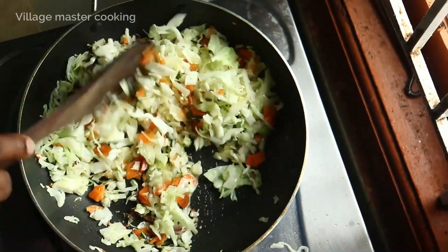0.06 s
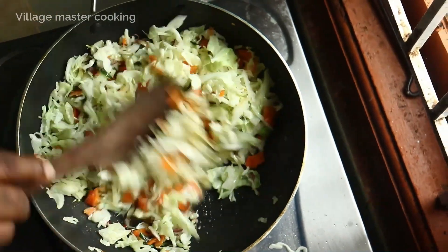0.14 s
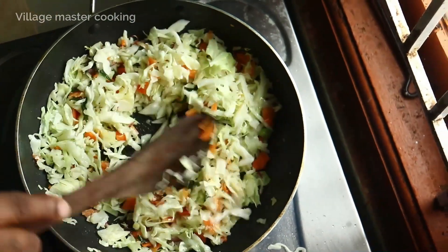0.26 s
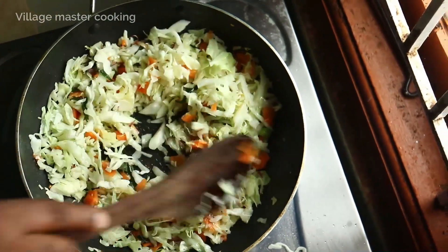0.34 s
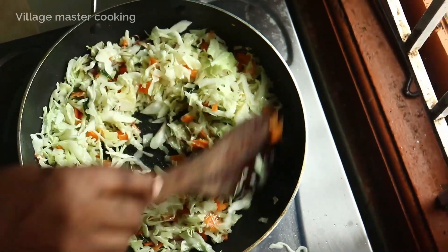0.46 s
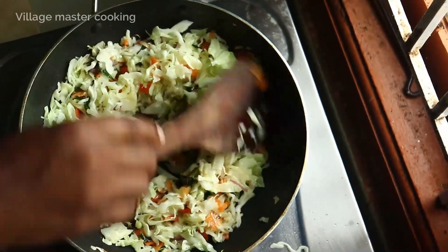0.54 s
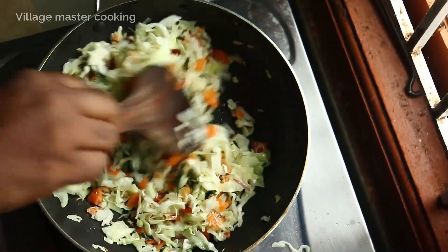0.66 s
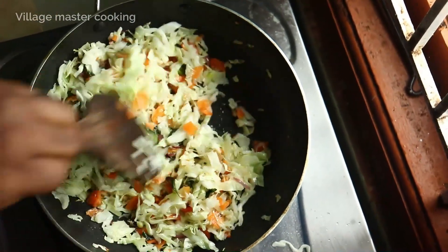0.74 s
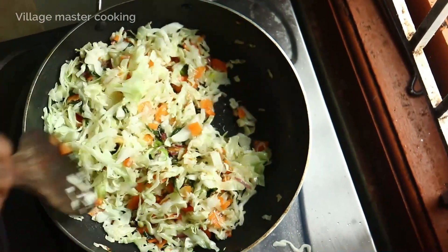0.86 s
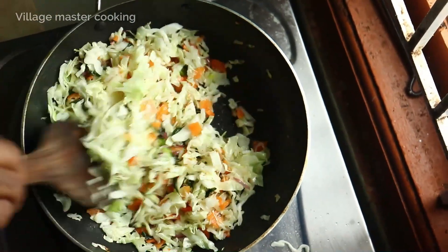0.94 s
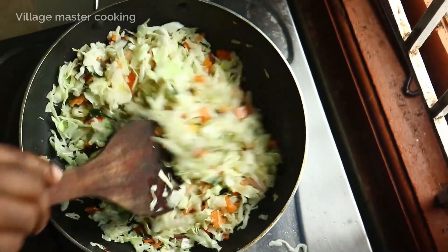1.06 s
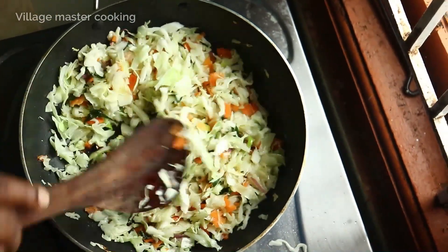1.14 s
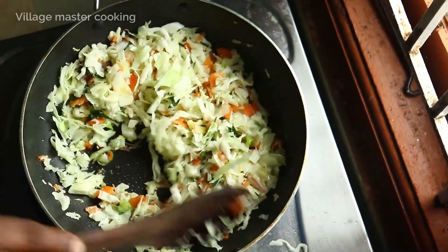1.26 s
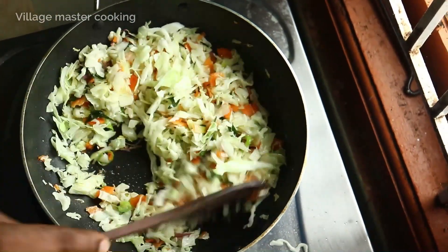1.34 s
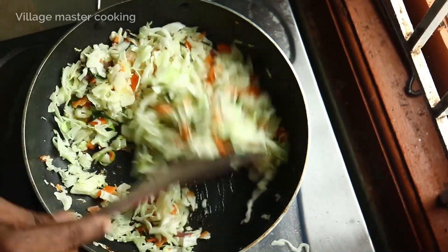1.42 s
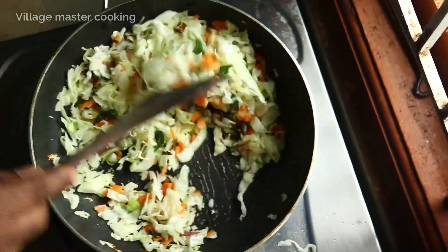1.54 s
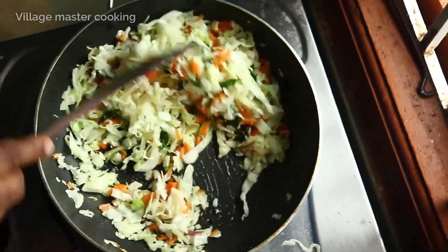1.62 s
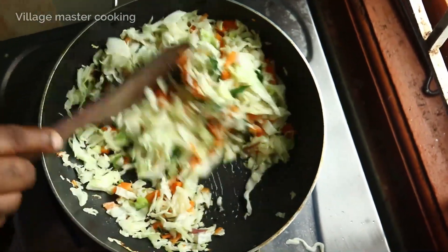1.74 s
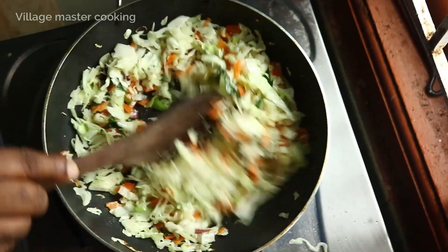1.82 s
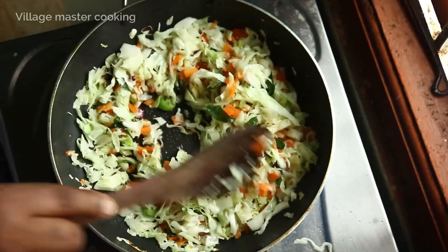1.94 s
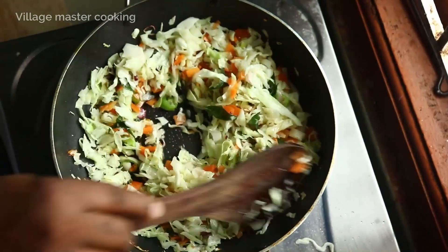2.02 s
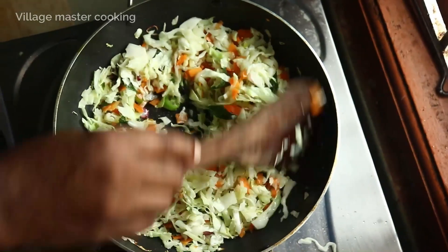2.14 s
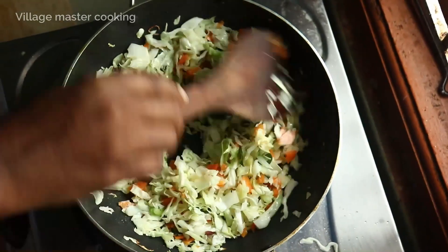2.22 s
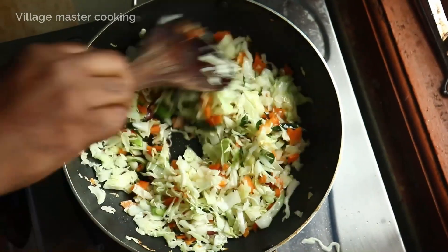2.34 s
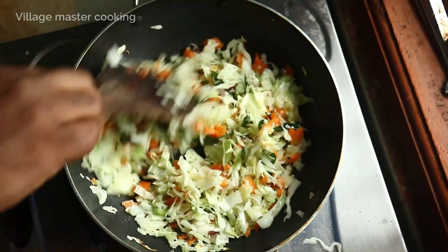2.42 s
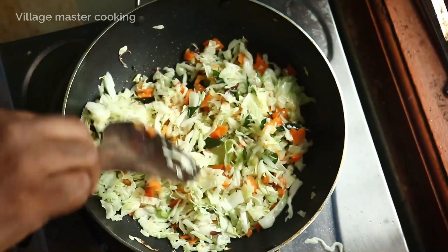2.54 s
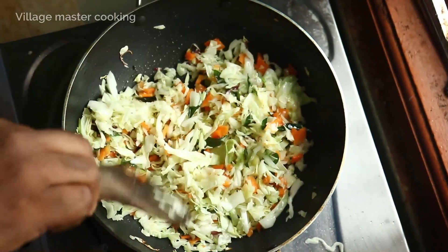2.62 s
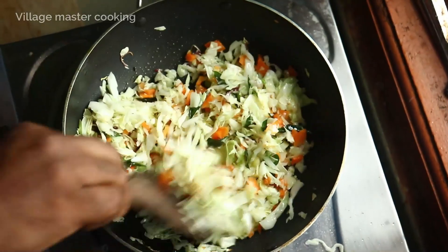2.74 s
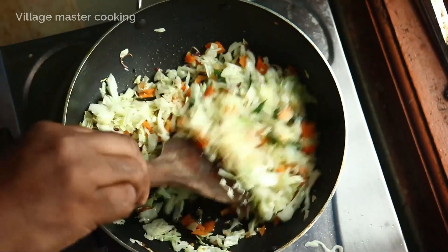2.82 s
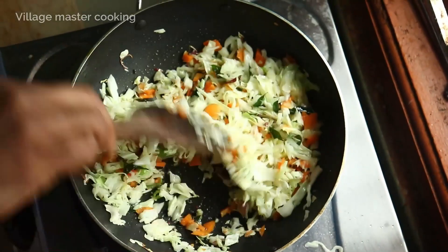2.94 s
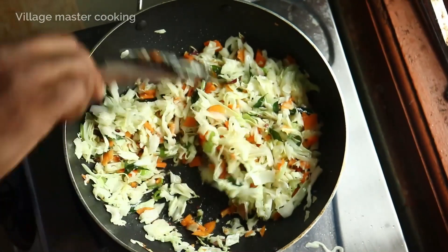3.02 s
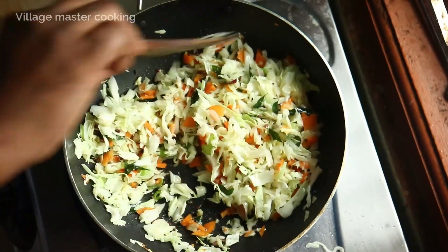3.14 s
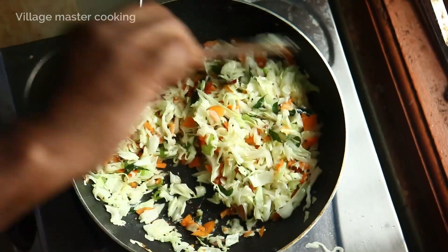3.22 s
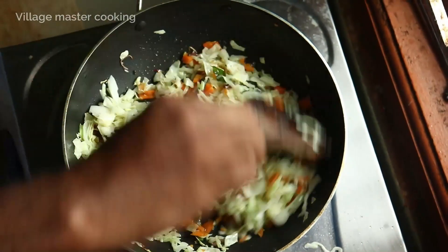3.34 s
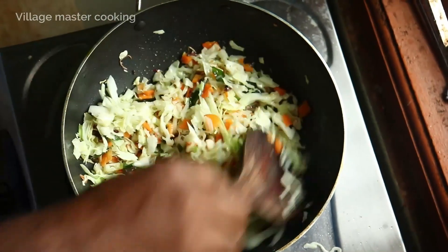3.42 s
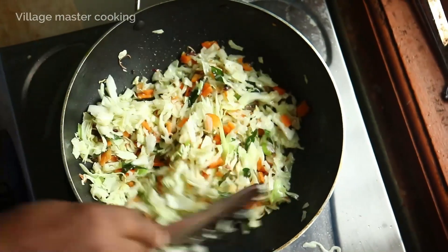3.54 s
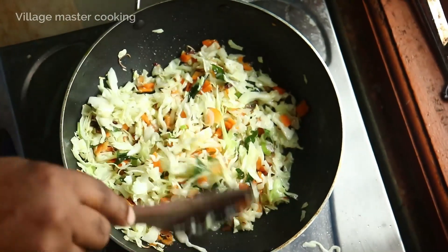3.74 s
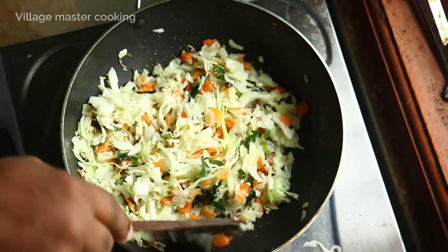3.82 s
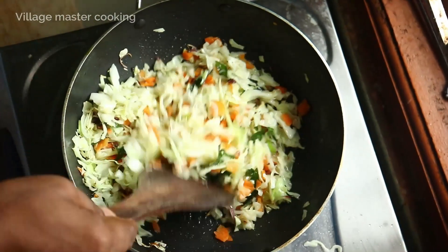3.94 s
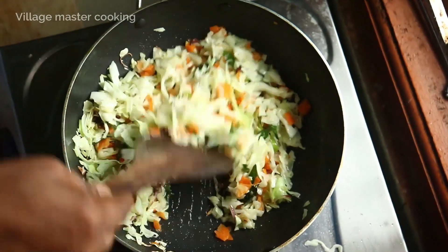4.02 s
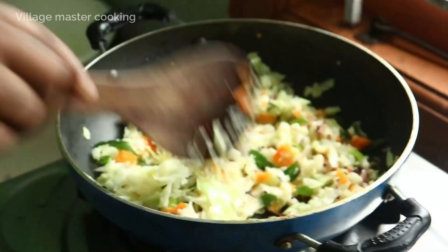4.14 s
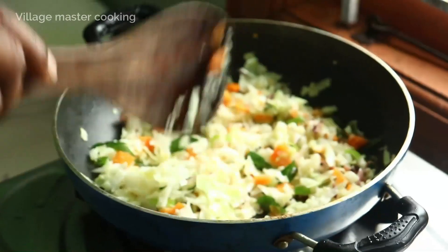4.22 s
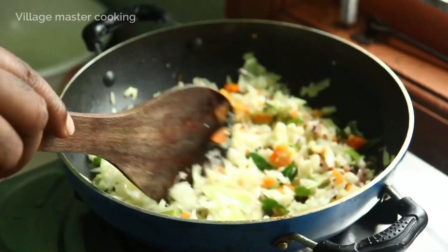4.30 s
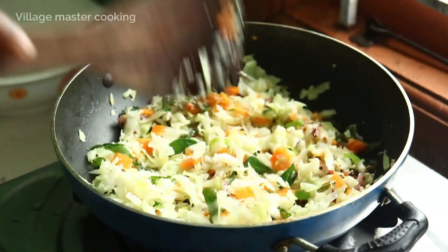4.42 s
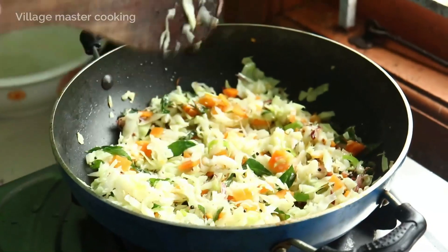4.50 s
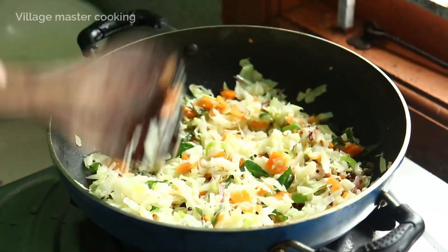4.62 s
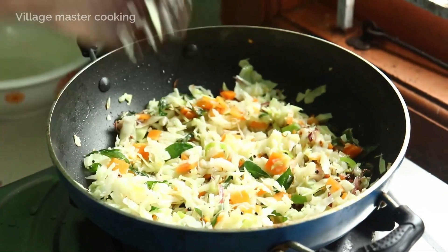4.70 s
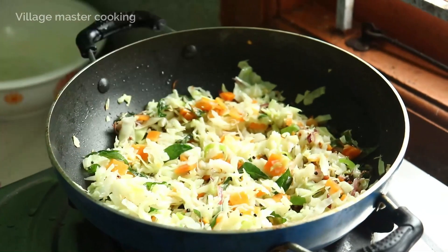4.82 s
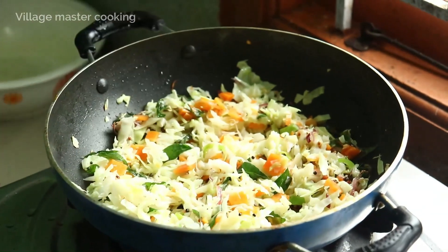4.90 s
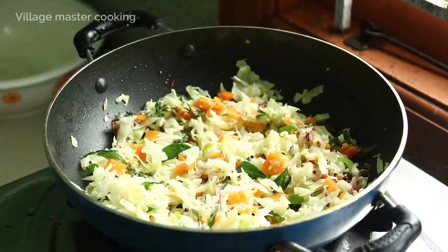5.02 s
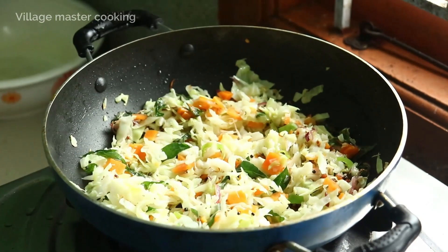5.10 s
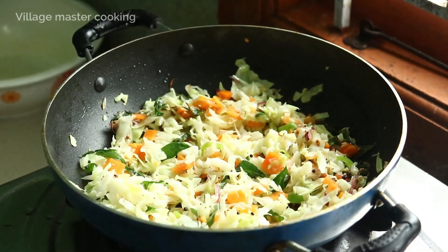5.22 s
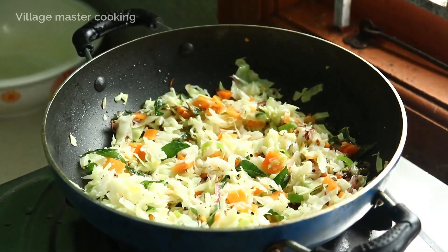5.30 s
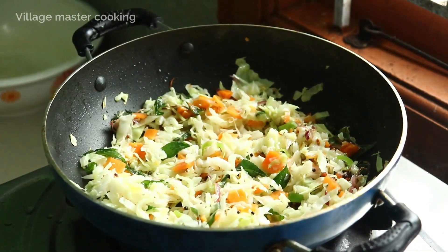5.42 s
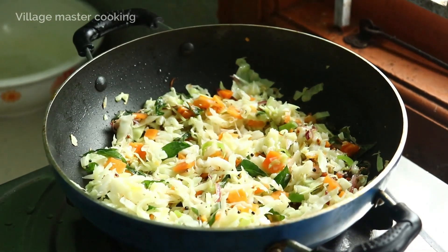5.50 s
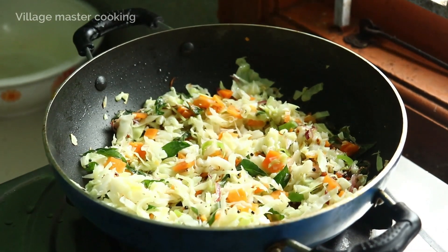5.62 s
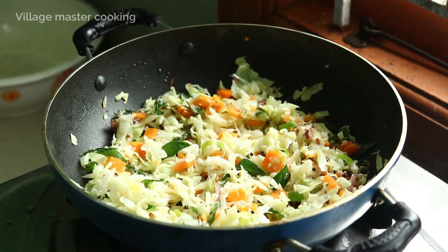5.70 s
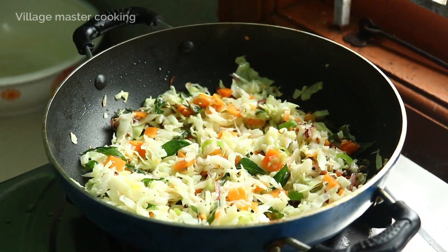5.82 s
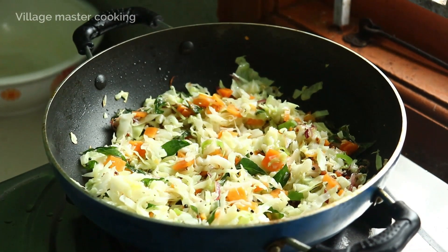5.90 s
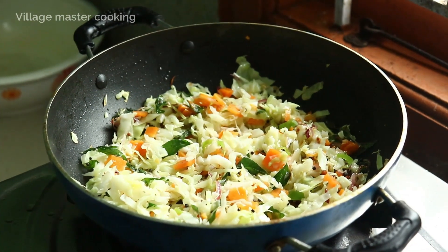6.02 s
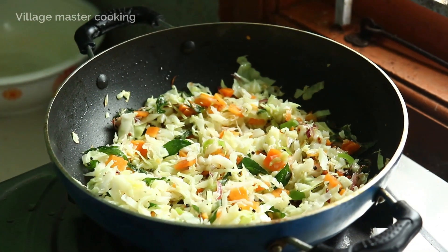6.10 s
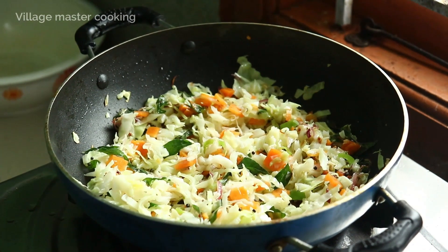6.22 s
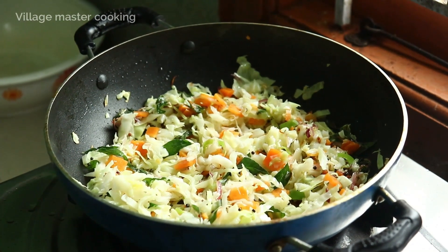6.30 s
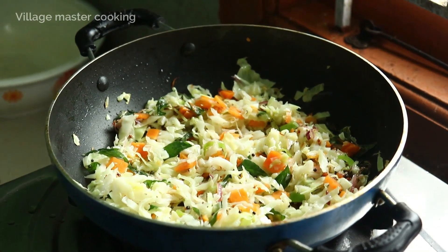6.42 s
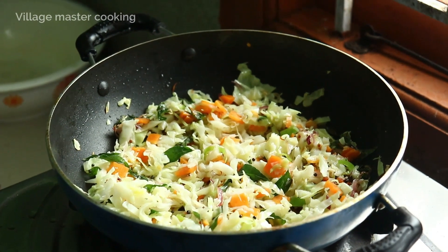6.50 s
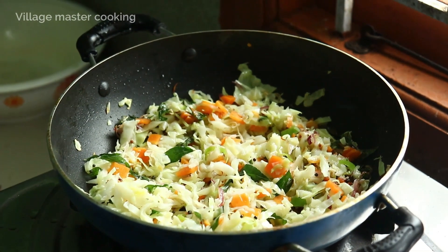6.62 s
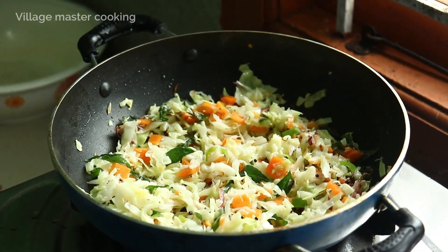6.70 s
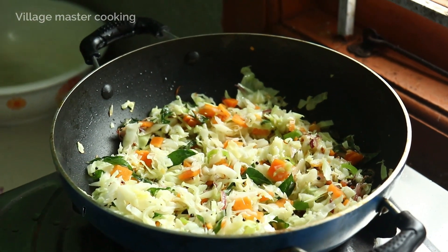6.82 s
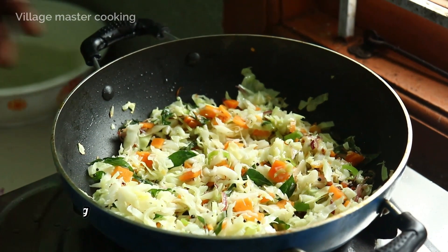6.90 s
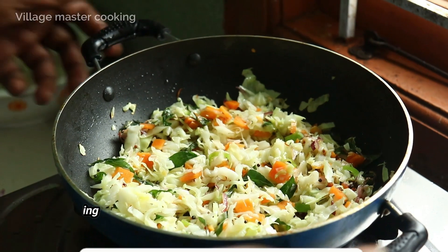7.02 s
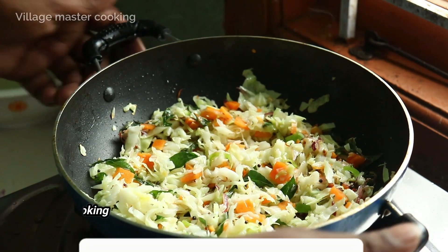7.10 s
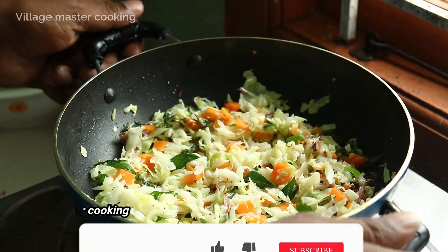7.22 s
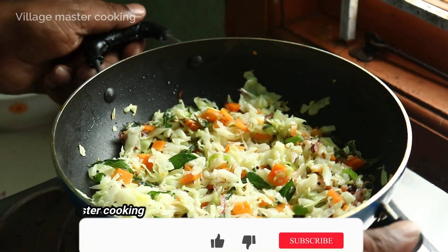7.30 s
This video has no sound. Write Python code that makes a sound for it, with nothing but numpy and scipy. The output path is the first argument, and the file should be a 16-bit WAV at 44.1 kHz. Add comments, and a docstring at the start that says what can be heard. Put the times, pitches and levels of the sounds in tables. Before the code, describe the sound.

Busy stir-frying with spatula knocks on a metal pan, cutting to softer sizzling, one hard wooden bang, utensil clacks and a final handle bump.

```python
"""Vegetables sizzling in a pan

Shredded vegetables sizzle (coloured noise and tiny bursts) in a hard-walled kitchen while a wooden spatula
scrapes (stick-slip bursts through pan resonances) and knocks the pan (damped modes and decaying noise).
The level dips for a few milliseconds, then the pan is heard duller, as from its side, and soon left alone.
Something wooden slams nearby, three light clacks follow as a utensil is laid down, and at the end a hand
takes hold of the pan."""
import sys
import numpy as np
from scipy import signal
from scipy.fft import rfft, irfft, next_fast_len
from scipy.io import wavfile
from scipy.ndimage import map_coordinates

SR = 44100
rng = np.random.default_rng(int(sys.argv[2]) if len(sys.argv) > 2 else 0)


def wrap_up_sound(samples):
    """Save the sound to the file named by the first command line argument, as 16-bit audio."""
    columns = np.atleast_2d(samples).T
    # keep every value between -1 and 1, then stretch to whole-number steps
    tamed = np.clip(columns, -1, 1)
    steps = np.round(tamed * 32767).astype(np.int16)
    wavfile.write(sys.argv[1], SR, steps)


N = 324135
TIME = np.arange(N) / SR
RING_TIME = np.arange(SR) / SR  # one second for each struck sound
DIP_S = 4.19  # the level dips here and the frying is duller from here on

# Resonances of the pan. Each row: frequency in Hz, relative strength in dB, 60 dB decay time in seconds.
PAN_MODES = [(154.4, -9, 0.47), (207, -4, .33), (231.5, 1, 0.25), (306.1, 0.5, 0.3), (320.3, -0.5, 0.64),
             (425, -1, 0.48), (468, -1, 0.41), (607, 1.5, 0.55), (661, 0, 0.78), (775, 3.5, 0.14),
             (833, 2.5, 0.35), (897, 0.5, 0.38), (932.5, 5.5, 0.22), (1056, -8, 0.8), (1140, -1.5, 0.28),
             (1399, -1, 0.19), (1620, -10, 0.32), (2024, -1.5, 0.15)]
# Likeness of the two ears. Each row: frequency in Hz, left-right correlation from -1 to 1.
EAR_LIKENESS = [(100, 0.99), (300, 0.98), (700, 0.79), (1400, 0.56), (2500, 0.21), (4500, 0.26),
                (8000, 0.12), (15000, -0.16)]


def amp(db):
    """Level: decibels to amplitude ratio."""
    return 10 ** (np.asarray(db) / 20)


def unit(x):
    """Normalization: scale to rms 1."""
    return x / np.sqrt(np.mean(x ** 2) + 1e-20)


def unit_onset(x, size=1764):
    """Normalization of a transient: scale its first 40 ms to rms 1."""
    return x / np.sqrt(np.mean(x[..., :size] ** 2) + 1e-20)


def along(points, hz):
    """Interpolation of (Hz, value) points on a logarithmic frequency axis."""
    point_hz, value = np.transpose(points)
    return np.interp(np.log(hz + 1), np.log(point_hz + 1), value)


def wobble(rate):
    """Slow random modulation: a smooth curve through random knots, rate of them a second."""
    knots = rng.standard_normal(int(N * rate / SR) + 4)
    return map_coordinates(knots, [TIME * rate])


def filtered(x, response):
    """Linear filtering: multiply the spectrum by a response of frequency."""
    n = x.shape[-1]
    padded = next_fast_len(n + 8192)
    spectrum = rfft(x, padded) * response(np.fft.rfftfreq(padded, 1 / SR))
    return irfft(spectrum, padded)[..., :n]


def below(hz, edge_hz, order=8):
    """Low-pass gain, falling ever more steeply above its edge."""
    return 1 / (1 + (hz / edge_hz) ** order)


def add(track, s, sound):
    """Superposition: mix a sound into a track at time s."""
    start = max(round(s * SR), 0)
    track[:, start:start + sound.shape[-1]] += sound[..., :N - start]


def half_angle(hz):
    """Interaural correlation as an angle: the cosine of twice this angle is the likeness."""
    return np.arccos(np.clip(along(EAR_LIKENESS, hz), -1, 1)) / 2


def diffuse(pair, spectrum):
    """Diffuse field: colour two unrelated signals and blend them, bass alike in both ears, treble apart."""
    def weights(hz):
        return amp(along(spectrum, hz)) * [np.cos(half_angle(hz)), np.sin(half_angle(hz))]
    mid, side = filtered(pair, weights)
    return unit(np.array([mid + side, mid - side]))


def ring(modes, scatter_db):
    """Modal decay: damped sines of random strength and phase; the higher ones reach the ears out of step."""
    hz, db, t60 = np.transpose(modes)[:, :, None]
    strength, phase, skew = rng.standard_normal((3, len(hz), 1))
    fade = amp(db + scatter_db * strength - 60 * RING_TIME / t60)
    apart = skew * half_angle(hz)
    cycles = hz * RING_TIME + phase
    ears = [np.sum(fade * np.sin(2 * np.pi * cycles + ear * apart), axis=0) for ear in (-1, 1)]
    return unit_onset(np.array(ears))


def clatter(spectrum, length, crack_db):
    """Reverberation: the crack of a contact, then noise in which each frequency dies at its own speed."""
    # Each row: frequency in Hz, relative 60 dB decay time, which length turns into seconds.
    room = [(100, 0.94), (250, 0.55), (700, 0.79), (1500, 0.56), (4000, 0.59), (12000, 0.5)]
    hz, t, z = signal.stft(rng.standard_normal((2, SR)), SR, nperseg=256)
    t60 = length * along(room, hz)[:, None]
    tail = signal.istft(z * amp(-60 * t / t60), SR, nperseg=256)[1][:, :SR]
    crack = amp(crack_db) * np.exp(-RING_TIME / 0.00045)
    return unit_onset(diffuse(tail, spectrum) * (1 + crack))


def bursts(rate, spread_db):
    """Shot noise: tiny bursts at random moments and of random sizes, each nearer to one ear."""
    when, size, side, lag = rng.random((int(rate * TIME[-1]), 4)).T
    gain = amp(-spread_db * np.log(np.maximum(size, .03))) * rng.choice([-1, 1], len(when))
    at = (when * (N - 8)).astype(int)
    left = np.bincount(at + 3, gain * np.cos(side * np.pi / 2), N)
    # the right ear hears each burst up to 3 samples earlier or later
    right = np.bincount(at + (lag * 7).astype(int), gain * np.sin(side * np.pi / 2), N)
    return unit(np.array([left, right]))


def swell(rise):
    """Exponential build-up of a contact with a time constant of rise seconds."""
    return 1 - np.exp(-RING_TIME / rise)


def direct(boost_db):
    """Direct sound: a struck thing stands out for a moment before the room takes over."""
    return 1 + amp(boost_db) * np.exp(-RING_TIME / .008)


def strokes(rows, attack, release):
    """Gesture envelopes, summed: each (start, length, size) builds up, holds and dies away exponentially."""
    total = 0
    for s, length, size in rows:
        onset = 1 - np.exp(-np.maximum(TIME - s, 0) / attack)
        total = total + size * onset * np.exp(-np.maximum(TIME - s - length, 0) / release)
    return total


def sizzle(spectrum, crackle_db, flutter_db):
    """Boiling noise: water bursts in the oil, near bursts over the blur of countless others, sputtering."""
    steam = rng.standard_normal((2, N)) + amp(crackle_db) * bursts(rate=1400, spread_db=3.5)
    steam = diffuse(steam, spectrum)
    boil = filtered(steam, lambda hz: below(hz, 6100))
    spray = steam - boil
    # the two bands flutter independently
    return boil * amp(flutter_db * wobble(30)) + spray * amp(flutter_db * wobble(30))


def frying():
    """Spectral colouring of boiling noise: bright as from above and flaring at turns, then duller, as from the side."""
    # Spectra before and after the dip. Each row: frequency in Hz, relative density in dB per Hz.
    spectrum_above = [(200, -21), (600, -11.5), (1000, -10), (1600, -4), (2800, -1), (3900, 2), (5000, 1),
                      (6200, -3), (9000, -2), (10500, -4), (13000, -3), (16000, -9.5)]
    spectrum_beside = [(260, -45), (450, -20), (610, -16.5), (720, -5.5), (890, -5.5), (960, -10),
                       (1530, -2), (1800, -4.5), (2800, 1.5), (3500, -1), (4250, 2.5), (7800, 0),
                       (11000, -7.5), (15900, -9)]
    # The spatula turns wet pieces onto hot metal. Each row: start in seconds, hold in seconds, flare in dB.
    turns = [(-0.1, 0.26, 2), (0.23, 0.18, 2.5), (0.76, 0.074, 2.5), (0.98, 0.28, 2.5), (1.36, 0.33, 1.2),
             (1.85, 0.13, 2), (2.49, 0.094, 5.5), (2.82, 0.16, 3), (3.56, 0.29, 2), (3.99, 0.12, 2.2),
             (4.41, 0.064, 1.5)]
    above_db, beside_db, settle_db_per_s = -26.5, -27, 0.42  # levels before the ear trims
    # left and right trims in dB
    above = sizzle(spectrum_above, crackle_db=-6.5, flutter_db=0.77) * amp([[-.2], [2.2]])
    beside = sizzle(spectrum_beside, crackle_db=-9.0, flutter_db=0.4) * amp([[1.4], [1.1]])
    settling_db = beside_db - settle_db_per_s * (TIME - DIP_S)
    steady = np.where(TIME < DIP_S, above * amp(above_db), beside * amp(settling_db))
    return steady * amp(strokes(turns, attack=0.098, release=0.078))


def rumble():
    """Low-frequency background noise: a faint room rumble wavers and swells once near the end."""
    # Each row: frequency in Hz, relative density in dB per Hz.
    hum = [(25, -12), (50, -16), (76, 9.5), (100, -15), (150, 8.5), (190, -2), (320, 2), (430, -4),
           (520, -5), (900, -22.5)]
    swell_db = strokes([(6.48, 0.9, 5.2)], attack=0.11, release=0.1)
    level_db = -54 + swell_db + 1.0 * wobble(6.3)
    return amp(level_db) * diffuse(rng.standard_normal((2, N)), hum)


def singing_rim():
    """Lightly damped resonance: the rim sings faintly when the spatula brushes or strikes it."""
    # Each row: frequency in Hz, relative strength in dB, 60 dB decay time in seconds.
    rim_modes = [(1057, -5.5, 0.5), (1585, 1, 0.51), (2080, -4, 0.44)]
    # Each row: start in seconds, level in dB.
    touches = [(0, -35), (0.115, -33), (3.228, -30)]
    out = np.zeros((2, N))
    for s, db in touches:
        add(out, s, amp(db) * ring(rim_modes, scatter_db=0) * swell(0.0059))
    return out


def pan_struck(favoured_hz, boost_db):
    """Modal excitation: the modes that move most at the point of contact ring strongest."""
    def boost(hz):
        return boost_db * np.exp(-(np.log(hz / favoured_hz) / 0.065) ** 2)
    return [(hz, db + boost(hz), t60) for hz, db, t60 in PAN_MODES]


def knocks():
    """Impact excitation: the spot shares a blow among stove, floor, wall and rim; soft ones are dull and slow."""
    # Spatula or hand on the pan. Each row: start in seconds, strength in dB, favoured mode in Hz.
    blows = [(0.083, -35, 303), (0.207, -29, 310), (0.341, -28, 814), (0.41, -31, 840), (0.5861, -19, 870),
             (0.881, -30.5, 315), (1.046, -31, 306), (1.189, -27.5, 710), (1.467, -40.5, 220),
             (1.687, -32, 305), (1.843, -29, 292), (1.962, -28, 800), (2.207, -21, 620), (2.347, -35, 233),
             (2.47, -38, 315), (2.9, -30.5, 270), (3.2277, -22.5, 2070), (3.384, -23.5, 786),
             (3.554, -39, 240), (3.98, -30.5, 235), (4.25, -47, 230), (4.443, -34.5, 293), (7.32, -27, 440)]
    # Spots from the middle of the pan to the rim. Each row: favoured mode in Hz, then the shares of
    # stove thump, floor, wall and rim in dB.
    spots = [(227, 0.5, -7, 2, -2.5), (300, -10.5, -0.3, -4, -4), (610, -8.5, -25, 0.9, -3),
             (875, -10, -18, -1.2, -6.5), (2060, -13, -5.5, -5, -0.5)]
    # Spectrum of the contact noise. Each row: frequency in Hz, relative density in dB per Hz.
    colour = [(60, -42), (130, -45), (210, -8), (330, -6), (430, 3), (525, -3), (680, 2), (900, -1),
              (1300, -5), (2100, -7.5), (2700, -15), (6000, -25), (16000, -57)]
    # Heavy low modes start later: rise in seconds of stove thump, floor, wall and rim in a firm stroke.
    firm_rises = [0.051, 0.0068, 0.013, 0.002]
    # vegetables cushion strokes below the firm level: treble lost and rise lengthened, in dB per dB
    firm_db, muffling, slowing = -28, 0.79, 0.38
    spot_hz, *shares = np.transpose(spots)
    out = np.zeros((2, N))
    for s, db, favoured_hz in blows:
        modes = ring(pan_struck(favoured_hz, boost_db=9), scatter_db=1)
        noise = amp(-2.0) * clatter(colour, length=0.83, crack_db=0)
        blow = (modes + noise) * direct(boost_db=1.5)
        # four bands, from 150 Hz up, stand for stove, floor, wall and rim
        under = [filtered(blow, lambda hz: below(hz, edge, order=16)) for edge in (150, 275, 375, 1200)]
        parts = np.diff([*under, blow], axis=0)
        softness_db = firm_db - db
        share_db = np.array([np.interp(np.log(favoured_hz), np.log(spot_hz), share) for share in shares])
        muffle_db = muffling * max(softness_db, 0) * np.array([0, 0, 1, 1])
        rises = np.array(firm_rises) * amp(slowing * min(softness_db, 10))
        gains = amp(db + share_db - muffle_db)
        for gain, part, rise in zip(gains, parts, rises):
            add(out, s, gain * unit_onset(part * swell(rise)))
    return out


def scrape():
    """Stick-slip friction: wood sticks and slips on the pan floor and keeps its modes murmuring."""
    # The spatula pushed across the pan floor. Each row: start in seconds, hold in seconds, level in dB.
    pushes = [(0.186, 0.24, -31), (1.044, 0.25, -35.5), (1.85, 0.2, -33), (2.3, 0.23, -36),
              (3.388, 0.21, -31.5), (3.98, 0.52, -46.5)]

    def pan(f):
        """Resonant response: a sum of band-passes, each 22 Hz wide."""
        return sum(amp(db) * 1j * f * 22 / (hz * hz - f * f + 1j * f * 22) for hz, db, _ in PAN_MODES)

    slip_spectrum = [(100, -16.0), (200, -15.0), (330, -3.0), (600, -11.0), (1000, -16.5), (2500, -0.5)]
    slips = diffuse(bursts(rate=500, spread_db=-0.5), slip_spectrum)
    pressure = strokes([(s, length, amp(db)) for s, length, db in pushes], attack=0.02, release=0.15)
    return unit(filtered(slips, pan)) * pressure


def spits():
    """Impulsive noise: short bright snaps, drops bursting in the oil and, at 4.2 s, one dry click."""
    # The click comes as the sound returns from the dip. Each row: start in seconds, level in dB.
    snaps = [(0.607, -17.5), (1.0125, -15), (1.893, -22), (2.0076, -19.5), (3.339, -19), (4.2004, -17.5),
             (6.0196, -20), (7.233, -24)]
    snap_spectrum = [(400, -22), (1500, -4.5), (4200, 1), (7000, -3), (15000, -10)]
    out = np.zeros((2, N))
    t = RING_TIME[:SR // 10]
    fade = np.exp(-t / 0.0029) + 0.17 * np.exp(-t / .015)  # snap, then faint echo
    for s, db in snaps:
        snap = diffuse(rng.standard_normal((2, len(t))), snap_spectrum)
        add(out, s, amp(db) * snap * fade)
    return out


def slam():
    """Impact and reverberation: a wooden panel slams, rebounds, rings and fills the room."""
    # The slam and its rebound. Each row: start in seconds, level in dB.
    impacts = [(4.7394, -5), (4.779, -12)]
    # Each row: frequency in Hz, relative density in dB per Hz.
    colour = [(40, -28), (110, -11), (150, -18), (250, -2.5), (420, -9), (540, -3.5), (680, 0), (880, -3.5),
              (1050, -3.5), (1800, -4), (2800, -9), (4500, -16.5), (8000, -21.5), (15000, -39)]
    # Each row: frequency in Hz, relative strength in dB, 60 dB decay time in seconds.
    panel_modes = [(153.7, -6.5, 0.75), (209.6, -3.5, 0.78), (303, 1, 0.28), (350.4, -4, 0.59),
                   (414, -4.5, 0.63), (435.4, -2.5, 0.72), (471, 2, 0.43), (653, 5, 0.24), (747, -8, 0.33),
                   (799, -5, 0.57), (828, -2, 0.52), (883, 0, 0.59), (1120, -12, 0.51), (1276, -3.5, 0.55),
                   (1350, -6, 0.42), (1630, -3, 0.57), (1753, 0, 0.28), (2820, -1, 0.22),
                   (4580, -1.5, 0.24)]
    out = np.zeros((2, N))
    for s, db in impacts:
        add(out, s, amp(db) * clatter(colour, length=0.84, crack_db=-8) * swell(0.00059))
    add(out, impacts[0][0], amp(-6.0) * ring(panel_modes, scatter_db=1.5) * swell(0.0057))
    return out


def clacks():
    """Coupled impact: a utensil clacks on a new spot each time and the hollow counter booms under it."""
    # Each row: start in seconds, clack level in dB, pitch in Hz, rise in seconds, thud level in dB,
    # boom level in dB.
    contacts = [(5.4044, -23.5, 1920, 0.00022, -42.5, -59.5), (5.573, -23.5, 1514, 0.0031, -38, -51),
                (5.707, -20, 1900, 0.00072, -33.5, -37)]
    # Modes of utensil and counter. Each row: frequency in Hz, relative strength in dB, 60 dB decay in seconds.
    utensil_modes = [(1640, -6, 0.18), (1970, 3, 0.38), (2290, 6, 0.13), (2800, -14, 0.16)]
    counter_modes = [(141.6, 0, 0.65), (234, -1, 0.36), (268, -4, 0.27), (378, -6, 0.49)]
    # Each row: frequency in Hz, relative density in dB per Hz.
    colour = [(60, -32), (200, -4.5), (700, -12), (1100, -13), (1600, 2.5), (2100, -0.5), (2800, -5),
              (4200, -6), (7000, -14), (16000, -40)]
    out = np.zeros((2, N))
    for s, db, hz, rise, thud_db, boom_db in contacts:
        # the mode at the point of contact stands out
        utensil = ring([(hz, 10, .3), *utensil_modes], scatter_db=2)
        noise = clatter(colour, length=0.93, crack_db=-4)
        clack = (noise + amp(-4.0) * utensil) * direct(boost_db=4)
        thud = ring(counter_modes, scatter_db=1.5) * swell(0.0051)
        boom = ring([(80, 0, 1.27)], scatter_db=0) * swell(.02)
        add(out, s, amp(db) * unit_onset(clack * swell(rise)))
        add(out, s, amp(thud_db) * thud + amp(boom_db) * boom)
    return out


def scene():
    """Superposition of all sources; the level dips for a few milliseconds before the pan is heard duller."""
    dip = np.clip((np.abs(TIME - DIP_S) - .004) / .002, .1, 1)
    pan = frying() + singing_rim() + knocks() + scrape() + spits()
    return (pan + rumble() + slam() + clacks()) * dip


def record(dry):
    """Saturation and band limiting: peaks near full scale are rounded, deepest bass and top treble removed."""
    rounded = dry / (1 + np.abs(dry) ** 6) ** (1 / 6)
    thinned = signal.sosfilt(signal.butter(2, 45, "highpass", fs=SR, output="sos"), rounded)
    return filtered(thinned, lambda hz: hz < 16050)


dry = scene()
out = record(dry)
wrap_up_sound(out)
```